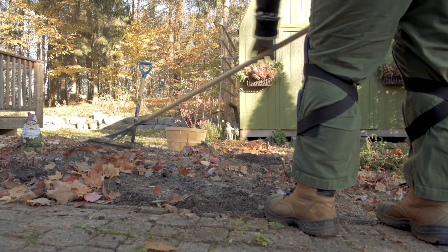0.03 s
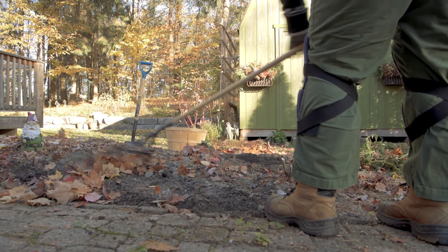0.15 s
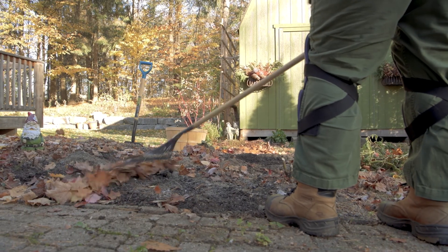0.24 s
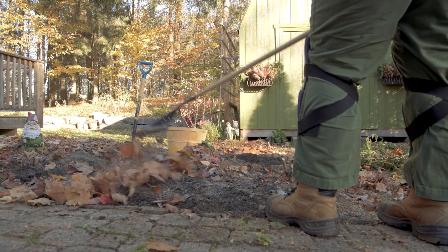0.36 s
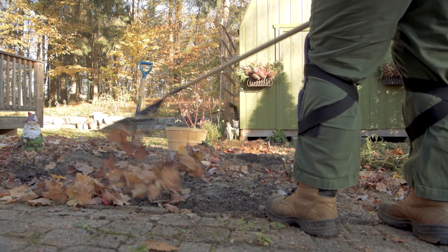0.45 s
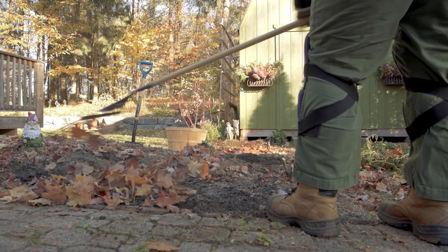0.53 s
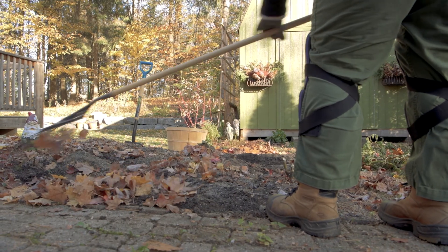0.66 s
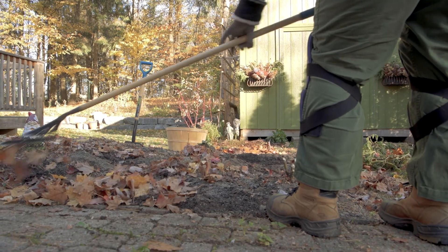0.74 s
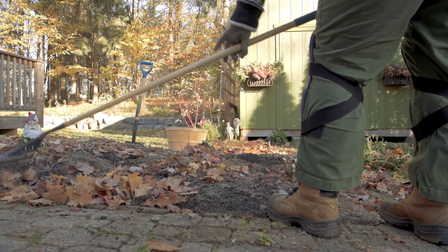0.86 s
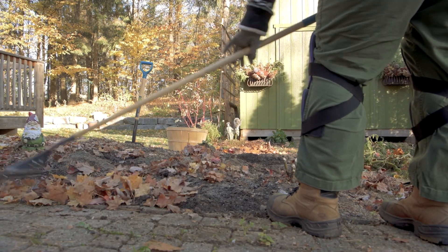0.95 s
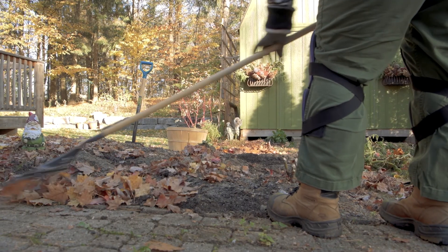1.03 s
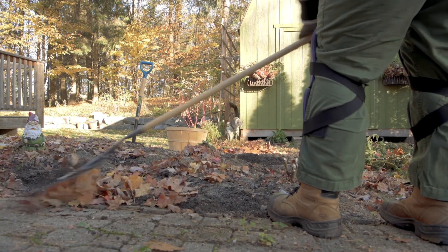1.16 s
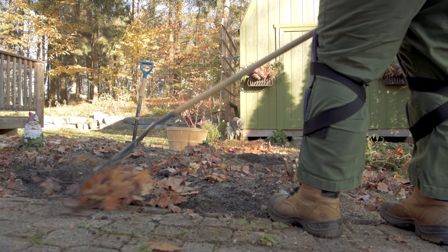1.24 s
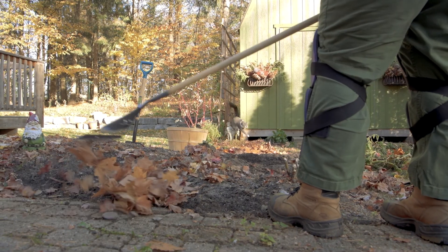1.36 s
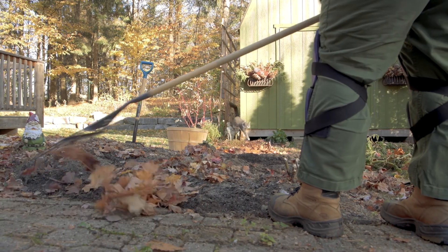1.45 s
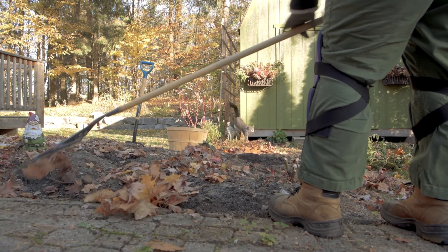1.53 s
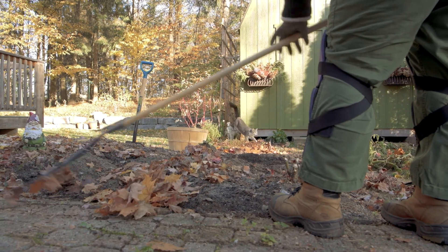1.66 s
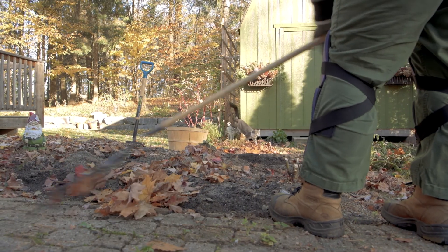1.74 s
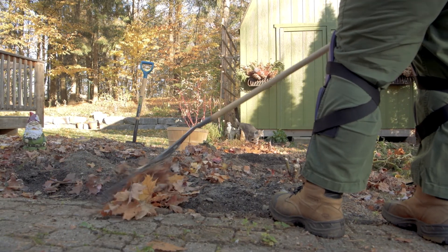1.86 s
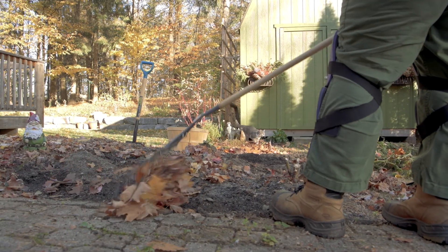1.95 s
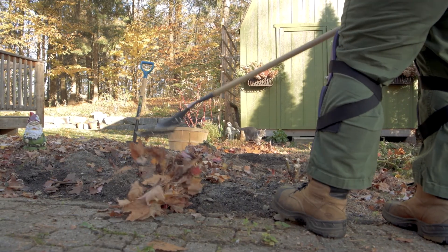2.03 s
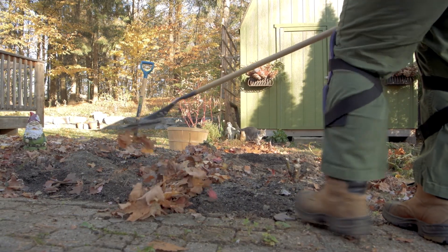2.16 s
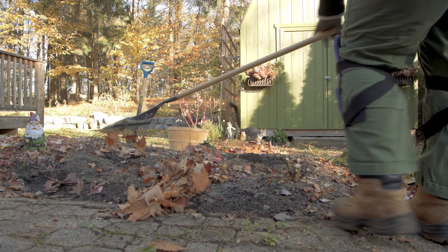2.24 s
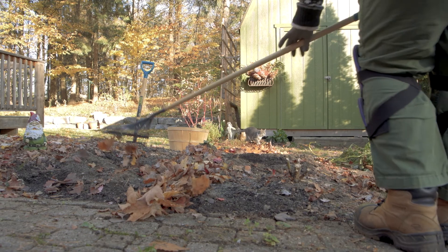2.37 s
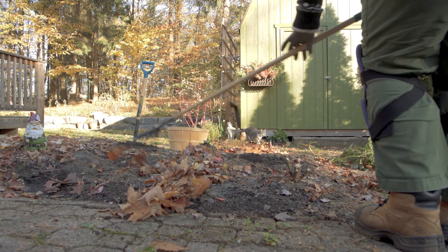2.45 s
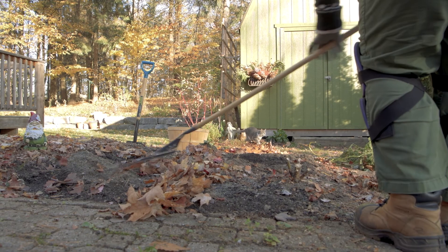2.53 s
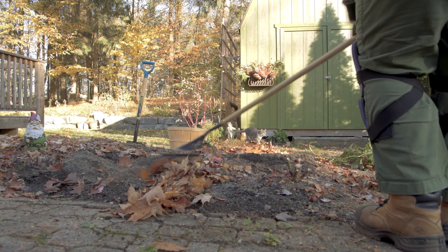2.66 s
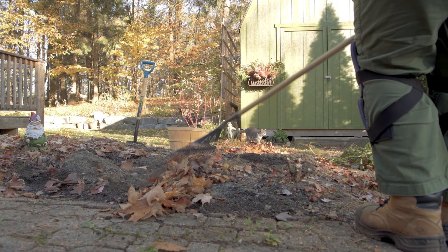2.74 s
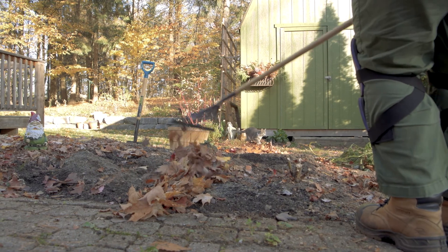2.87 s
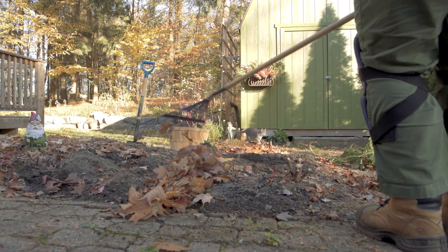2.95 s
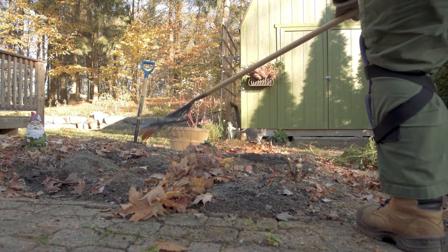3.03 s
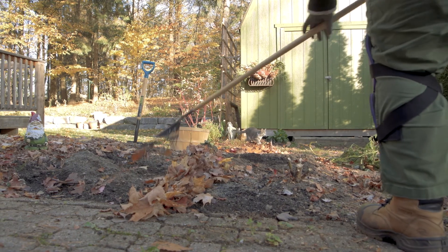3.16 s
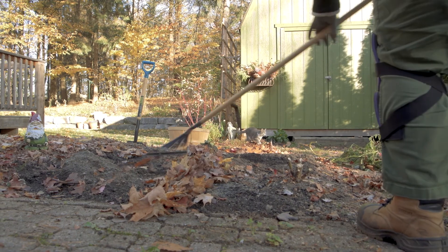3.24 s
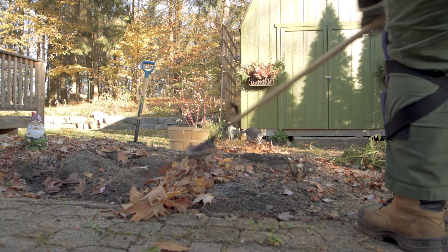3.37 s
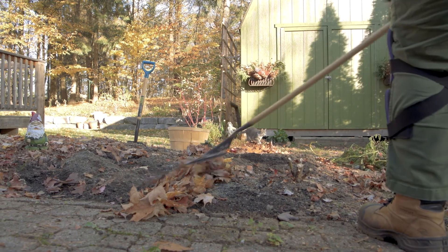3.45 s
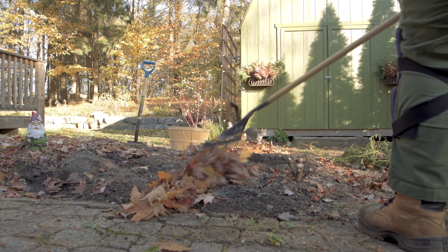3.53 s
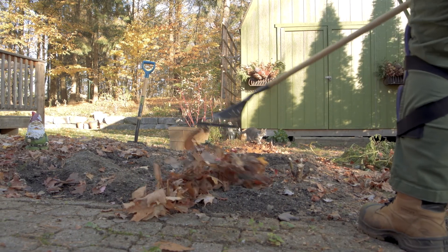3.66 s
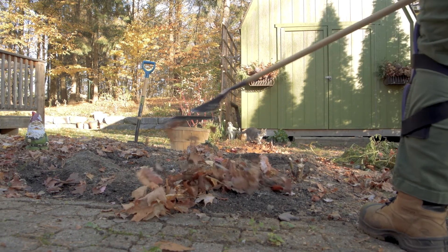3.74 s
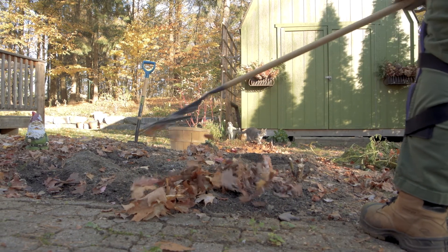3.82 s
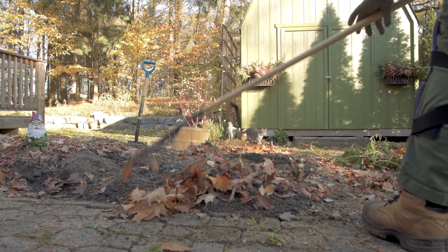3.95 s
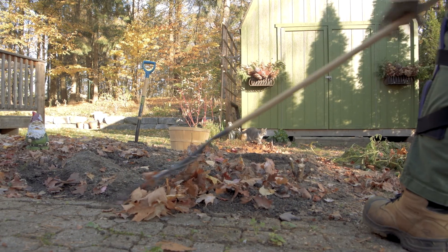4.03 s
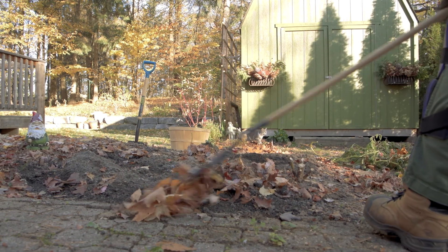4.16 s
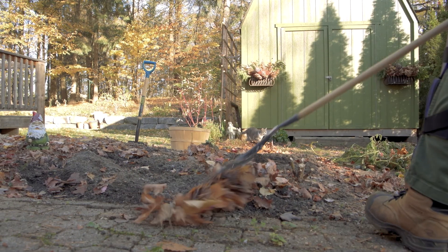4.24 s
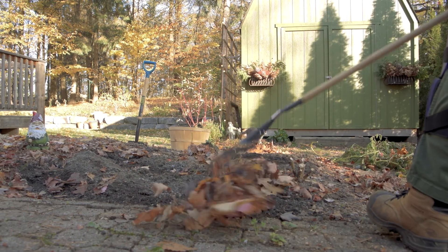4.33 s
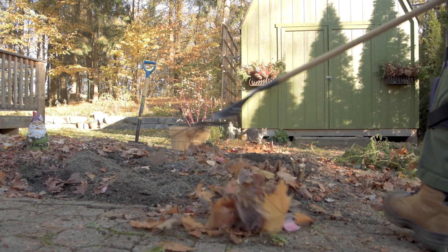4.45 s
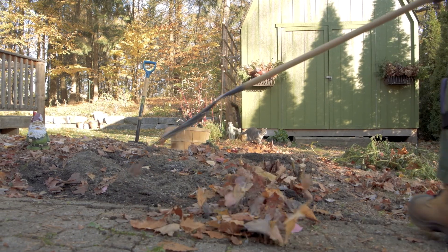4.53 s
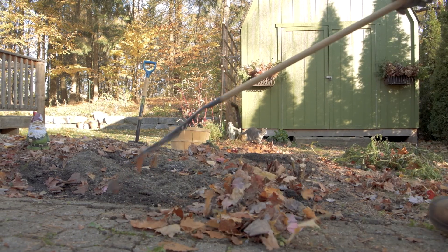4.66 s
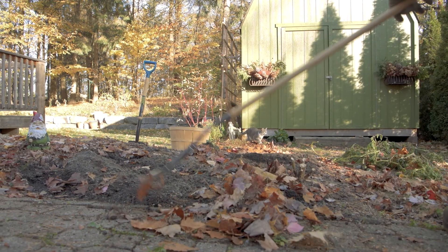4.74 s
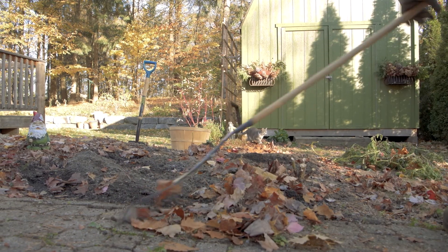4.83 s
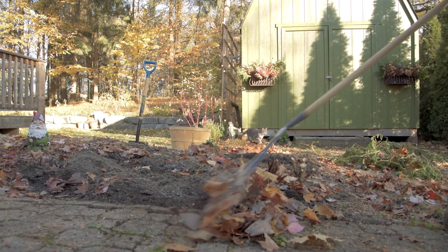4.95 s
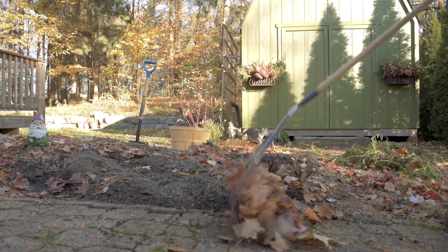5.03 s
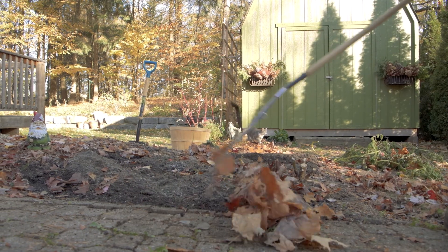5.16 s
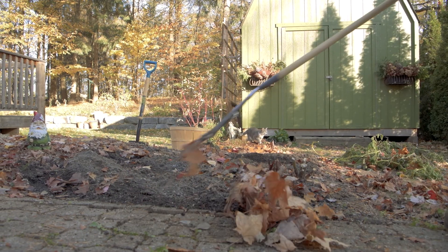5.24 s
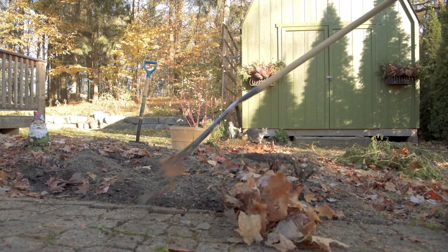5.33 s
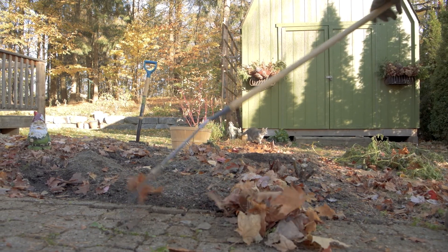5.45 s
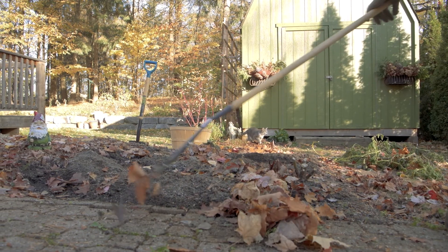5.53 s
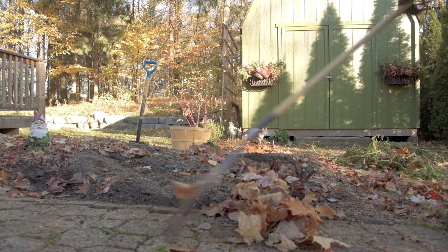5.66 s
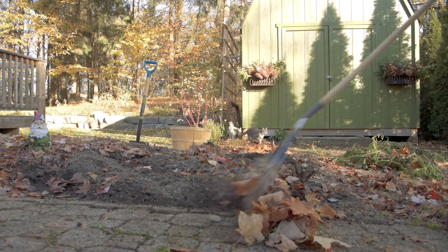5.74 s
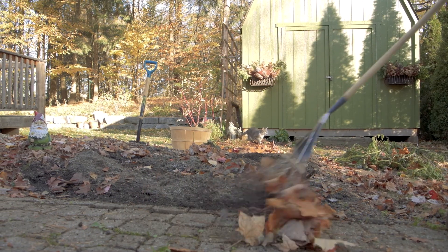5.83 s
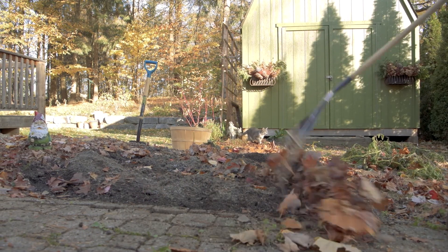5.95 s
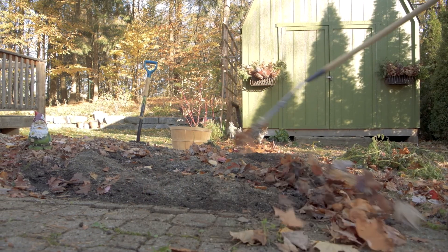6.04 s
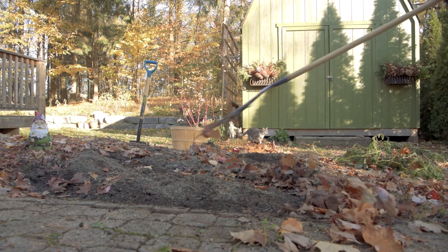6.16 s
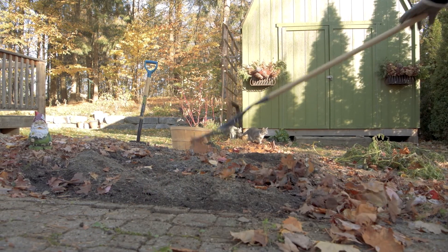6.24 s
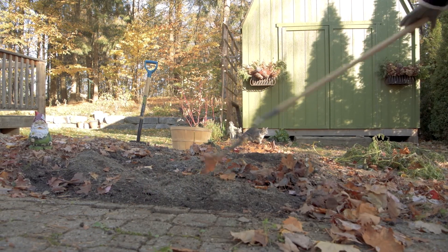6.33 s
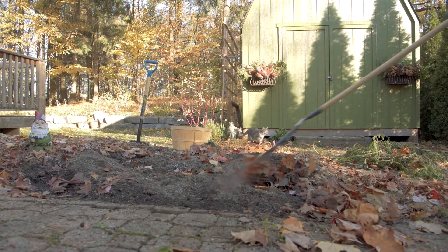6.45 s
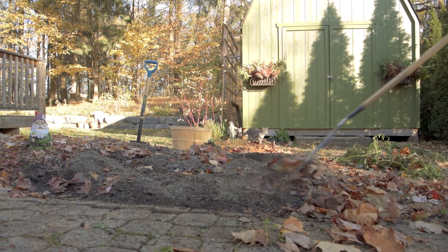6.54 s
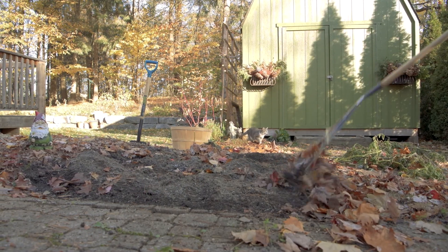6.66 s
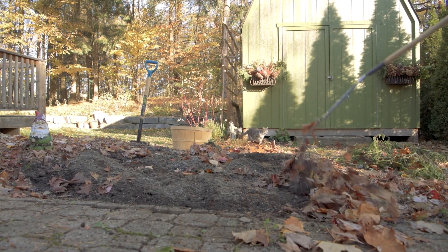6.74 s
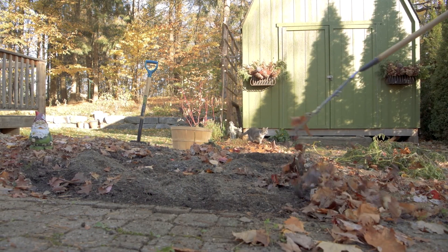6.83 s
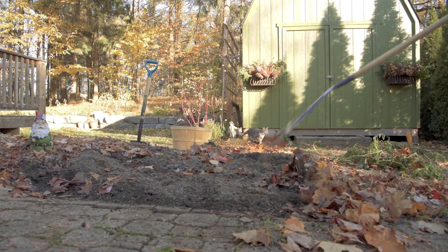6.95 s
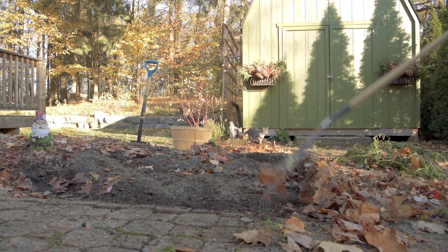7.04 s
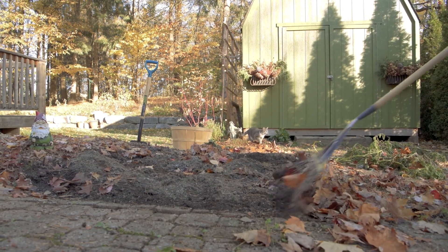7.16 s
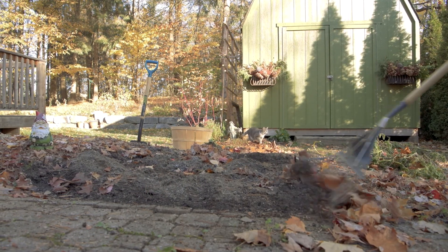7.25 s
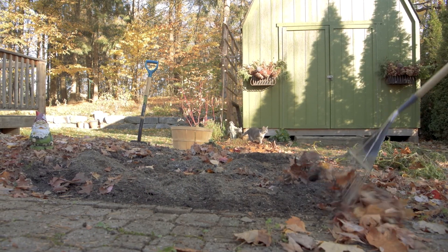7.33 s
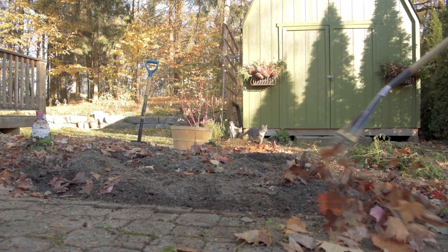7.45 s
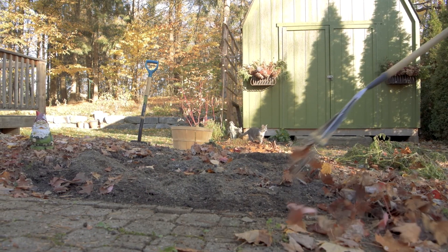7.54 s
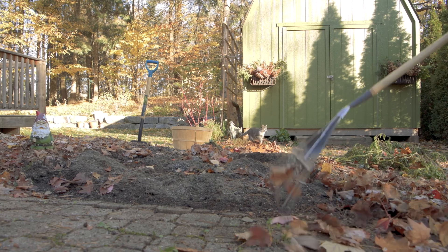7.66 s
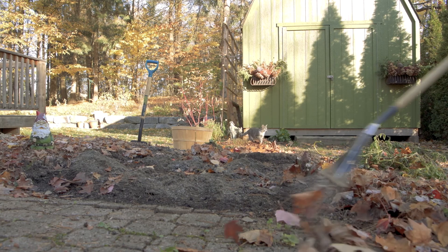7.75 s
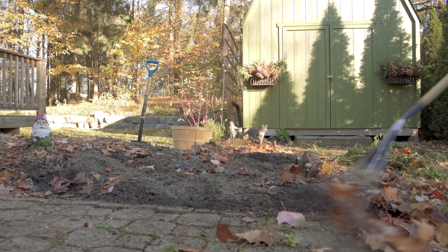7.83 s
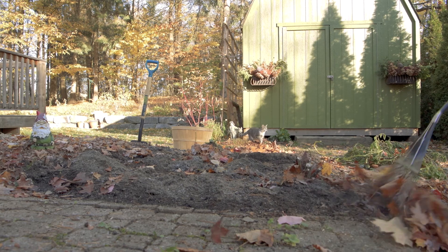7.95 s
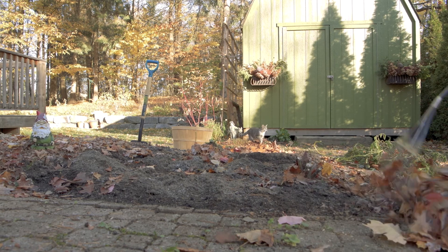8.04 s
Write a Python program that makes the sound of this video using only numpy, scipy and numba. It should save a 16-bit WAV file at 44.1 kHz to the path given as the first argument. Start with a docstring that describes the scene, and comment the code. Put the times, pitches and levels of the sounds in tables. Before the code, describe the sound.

A garden rake works steadily near the microphone. Thin tines tick, scratch and chatter over hard crumbs while dry leaves crackle and the rake head rings faintly. Pulls last about a third of a second, separated by quieter gaps with tumbling leaves, a slight boot shift or rattle. Strokes bunch up later; stalks snap, wind puffs rumble softly and two dull bumps come late. Open yard, short dull reflections.

```python
"""Under a faint outdoor hush, a leaf rake is pulled in quick strokes through dry leaves and frozen soil.
In each stroke the tines land as scattered clicks, then stick and slip; one click train rings tines and head.
The head's resonances shift through the pull, leaves crackle in runs of clicks, and settle after the lift.
Stalks snap, boots shift and the lifted rake rattles as soft noise swells; from about a second in,
puffs of air rumble as low noise on the microphone; late on come two dull, decaying-sine bumps."""
import sys
import numpy as np
from scipy import signal
from scipy.fft import rfft, irfft
from scipy.io import wavfile
from scipy.ndimage import map_coordinates
from numba import njit

SR = 44100
rng = np.random.default_rng(int(sys.argv[2]) if len(sys.argv) > 2 else 0)


def int16_out(signal):
    """Quantize to a 16-bit WAV file."""
    q = np.round(np.clip(np.atleast_2d(signal).T, -1, 1) * 32767)
    wavfile.write(sys.argv[1], SR, q.astype(np.int16))


N = 356813
T = np.arange(N) / SR

# spectrum of the thin tines ringing: f/Hz, relative level/dB
TINE_SPECTRUM = [(1500, -83.5), (4000, -10.5), (6000, -17), (6600, -5), (7200, 2), (7800, 2.5), (8600, 2),
                 (9800, -1.5), (11000, -6.5), (13000, -15.5), (16000, -24.5)]
# spectrum of dry leaves crackling: f/Hz, relative level/dB
CRACKLE_SPECTRUM = [(400, -34.5), (1200, -10.5), (2000, -13.5), (2800, -5), (4100, -1.5), (5000, -3.5),
                    (6000, -7.5), (10000, -10.5), (13000, -11), (16000, -27)]


def undb(db):
    """Decibels to gain."""
    return 10 ** (np.asarray(db) / 20)


def colour(x, points, size=4096):
    """Minimum-phase filter with a spectrum of (f/Hz, level/dB) points, scaled to unit energy."""
    hz, db = np.transpose(points)
    bin_hz = np.arange(size // 2 + 1) * SR / size
    gain_db = np.interp(np.log(bin_hz + 1), np.log(hz), db)
    cepstrum = irfft(np.log(undb(gain_db)))
    # folding the cepstrum forward makes the filter causal
    cepstrum[1:size // 2] *= 2
    cepstrum[size // 2 + 1:] = 0
    response = irfft(np.exp(rfft(cepstrum)))
    return signal.oaconvolve(x, response / np.linalg.norm(response))[:N]


def walk(rate):
    """Random levels, rate a second, joined by straight lines; spread near 1."""
    knots = rng.standard_normal(N // 20)
    line = np.interp(T * rate, np.arange(len(knots)), knots)
    return line * np.sqrt(3 / 2)  # restores the spread lost between knots


def clicks(rate, spread_db):
    """Random clicks, rate a second, most small and a few large; rms 1."""
    chance, size, sign = rng.random(N), rng.exponential(size=N), rng.choice([-1, 1], N)
    strength = undb(spread_db * np.minimum(size, 4.5))
    x = (chance < rate / SR) * sign * strength / np.sqrt(rate)
    return x / np.std(x)


def bursts(times, gains, decay_s):
    """Envelope of blows that start at once and die away exponentially."""
    blows = np.bincount((times * SR).astype(int), gains, N)
    return signal.lfilter([1], [1, -np.exp(-1 / (decay_s * SR))], blows + 1e-18)


def hops(rate, decay_s, steady):
    """Jerky friction: the force jumps at each hop and relaxes after it; rms 1."""
    kicks = (rng.random(N) < rate / SR) * rng.uniform(.3, 1, N)
    force = signal.lfilter([1], [1, -np.exp(-1 / (decay_s * SR))], kicks) + steady
    return force / np.sqrt(np.mean(force ** 2))


def ramp(start_s, length_s):
    """Straight rise from 0 to 1."""
    return np.clip((T - start_s) / length_s, 0, 1)


def hump(middle_s, half_s):
    """A smooth bell-shaped swell that peaks at 1."""
    return np.exp(-np.minimum(((T - middle_s) / half_s) ** 2, 50))


def swells(events, width_s):
    """Summed envelope of soft rubs, one for each (t/s, level/dB)."""
    return sum(undb(db) * hump(s + width_s, width_s) for s, db in events)


@njit
def resonate(x, hz, width):
    """State-variable band-pass whose centre moves; gain 1 at the centre."""
    y, band, low = np.empty(len(x)), 0., 0.
    for i in range(len(x)):
        g, k = np.tan(np.pi * hz[i] / SR), width / hz[i]
        v = (band + g * (x[i] - low)) / (1 + g * (g + k))
        band, low, y[i] = 2 * v - band, low + 2 * g * v, k * v
    return y


def garden():
    """Faint outdoor hush: coloured noise with a slowly wandering level."""
    # spectrum of the hush: f/Hz, relative level/dB
    hush_spectrum = [(20, 2), (60, -7), (130, -7.5), (280, -2.5), (450, -6.5), (1000, -9.5), (2000, -10.5),
                     (4000, -6), (9000, -16.5), (16000, -21)]
    level_db = -48.5 + 1.2 * walk(3)
    return colour(rng.standard_normal(N), hush_spectrum) * undb(level_db)


def stroke(name):
    """One column of the stroke table, held from each landing to the next."""
    # one row a stroke: lands t/s, bites t/s, lifts t/s, first touch relative to the pull/dB,
    # tine scratch/dB, sag by the end of the pull/dB, leaf rustle/dB, load on the head/dB, settling leaves/dB,
    # bending resonance at the bite f/Hz and at the lift f/Hz (before flexing),
    # relative levels of twisting mode/dB, soil/dB, tip rasp/dB
    stroke_rows = [ (0.006, 0.04, 0.31, -17.5, -11, 2, -22, -29.5, -29.5, 1220, 1190, 13.5, 2.5, -4),
                   (0.833, 0.907, 1.28, -9.5, -10, 7.5, -26, -35, -31.5, 1100, 1140, 10.5, -7, -12),
                   (1.628, 1.68, 1.934, -19, -10.5, 6, -26, -31.5, -33.5, 1060, 1200, 10, -9, 2.5),
                   (2.459, 2.501, 2.747, -17, -16.5, -5.5, -24, -30.5, -33.5, 1080, 1104, 4, -6, -1),
                   (3.213, 3.295, 3.503, -7, -15, 3.5, -25, -25.5, -30, 1075, 1150, 4, -2.5, -6),
                   (4.004, 4.036, 4.277, -5.5, -11, 6, -25.5, -25.5, -38.5, 1065, 1220, 10, -3, -1.5),
                   (4.772, 4.806, 5.020, -8.5, -11.5, 2, -25, -26, -41, 1130, 1070, 2, -2.5, 1.5),
                   (5.418, 5.445, 5.46, -3.5, -20.5, -0.5, -26, -37.5, -28, 1100, 1118, -8, 2, 2),
                   (5.597, 5.608, 5.886, -9.5, -11.5, 11, -25, -26.5, -33, 1155, 1085, -8, -1, 5.5),
                   (6.348, 6.398, 6.655, -9.5, -18.5, 29.5, -25, -29.5, -34, 1120, 1200, -14, 8.5, -7),
                   (7.078, 7.109, 7.240, -5, -15.5, 4, -28.5, -27.5, -38, 1170, 1060, 5, 0, 11),
                   (7.256, 7.277, 7.338, -7, -16.5, 0.5, -26.5, -26.5, -35.5, 1140, 1070, 8, 0, -2),
                   (7.734, 7.756, 7.98, -9, -18, 7, -25, -23.5, -39.5, 1170, 1046, 4, -4, 5.5)]
    columns = "land bite lift touch scratch sag rustle load settle bend_from bend_to twist soil rasp".split()
    table = np.array(stroke_rows)
    row = np.maximum(np.searchsorted(table[:, 0], T) - 1, 0)
    return table[row, columns.index(name)]


def progress():
    """How far the pull has come: 0 at the bite, 1 at the lift."""
    return ramp(stroke("bite"), stroke("lift") - stroke("bite"))


def effort():
    """Touch, bite, sagging pull and lift set the tine scratch, the leaf rustle and the load on the head."""
    # the tines ride up on leaves and lose their grip: middle t/s, half length/s, depth/dB
    skips = [(0.249, .064, 15), (0.878, 0.04, 16), (1.924, 0.015, 7), (3.266, 0.023, 13), (3.498, .014, 6),
             (4.194, 0.032, 11), (7.12, 0.0092, 9)]
    # tossed leaves tumble back onto the heap: middle t/s, half length/s, rustle level/dB
    tumbles = [(.65, 0.021, -47), (3.772, 0.079, -41.5), (4.41, 0.11, -40.5), (6.883, .015, -45.5)]
    land_s, bite_s = 0.011, 0.05  # rise of the first touch and of the pull
    sag_power = 2.2  # the pull weakens late rather than early
    tine_release, leaf_release, head_release = 348, 179, 156  # dB per second after the lift
    settle_db_per_s = 38  # stirred leaves come to rest
    leaf_share, head_share = 0.14, 0.56  # how far leaves and head follow a weakening pull
    cling_tine_db, cling_head_db = -4.5, -14  # settling leaves still brush the lifted tines and head

    touch = undb(stroke("touch")) * ramp(stroke("land"), land_s)
    press = touch + (1 - touch) * ramp(stroke("bite"), bite_s)
    slack_db = stroke("sag") * progress() ** sag_power
    slack_db = slack_db + sum(db * hump(s, half_s) for s, half_s, db in skips)
    lifted_s = np.maximum(T - stroke("lift"), 0)
    settling = undb(stroke("settle") - settle_db_per_s * lifted_s) * progress()
    settling = settling + sum(undb(db) * hump(s, half_s) for s, half_s, db in tumbles)
    scratch = press * undb(stroke("scratch") - slack_db - tine_release * lifted_s)
    rustle = press * undb(stroke("rustle") - leaf_share * slack_db - leaf_release * lifted_s)
    load = press * undb(stroke("load") - head_share * slack_db - head_release * lifted_s)
    return (np.hypot(scratch, settling * undb(cling_tine_db)), np.hypot(rustle, settling),
            np.hypot(load, settling * undb(cling_head_db)))


def tines(scratch, slips):
    """Slips ring the thin tines, which chatter as they hop over frozen crumbs; hard grains tick on them."""
    # spectrum of hard grains ticking on the tines: f/Hz, relative level/dB
    grit_spectrum = [(2000, -31), (6000, 3), (9000, -31), (13000, 26), (16000, 2)]
    chatter = hops(190, .004, 1.2)
    ring = colour(slips * scratch * chatter, TINE_SPECTRUM) * undb(-1.08)
    ticks = colour(clicks(600, 3.2), grit_spectrum) * undb(-21)
    return ring + ticks * scratch


def sway():
    """A mode swells and fades as other tines take the load."""
    return undb(3.2 * walk(18))


def head(push, twist_hz=1492):
    """The fan rings: a bending mode that shifts with the pull, a twisting mode and a few that only waver."""
    # other resonances of the rake head: centre f/Hz, width/Hz, relative level/dB
    wavering_modes = [(995, 45, 1.5), (1873, 76, 2.5), (2247, 144, 4), (2500, 150, 1), (3690, 740, -4.5)]
    bend_hz = stroke("bend_from") + (stroke("bend_to") - stroke("bend_from")) * progress()
    flex = 1 + .018 * walk(12)
    out = resonate(push, bend_hz * flex ** 2, 78.0) * undb(8.5)
    out += resonate(push, twist_hz * np.sqrt(flex), 36.0) * undb(stroke("twist") - 1.0)
    for hz, width_hz, db in wavering_modes:
        out += resonate(push, hz * flex, 1. * width_hz) * undb(db) * sway()
    return out


def squeak(length_s, hz, width_hz, glide):
    """A brief swell of stick-slip: noise in one narrow, sliding resonance; rms near 0.7."""
    count = int(length_s * SR)
    slide_hz = hz * (1 + glide * np.linspace(-1, 1, count))
    ring = resonate(rng.standard_normal(count), slide_hz, 1. * width_hz)
    return ring / np.std(ring) * np.sin(np.linspace(0, np.pi, count))


def catches(pull, count=1100):
    """Single tines keep catching, each at a pitch of its own; a few drag long and loud."""
    # a tine drags over a stone or stiff leaf: start t/s, length/s, centre f/Hz, relative level/dB
    long_catches = [(0.084, .067, 2220, -26.5), (1.182, 0.19, 1470, -34), (1.86, 0.096, 1470, -31.5),
                    (3.281, 0.07, 1096, -26), (4.17, 0.055, 1225, -29.5), (4.82, 0.071, 3310, -26.5),
                    (4.87, 0.035, 2070, -25), (5.608, .064, 2600, -19), (5.748, 0.11, 1080, -29),
                    (6.403, 0.04, 2090, -27), (6.453, 0.069, 2730, -24), (7.144, .14, 3870, -25.5),
                    (7.16, 0.097, 1500, -35), (7.301, .049, 2230, -29), (7.81, .057, 1480, -27)]
    small, large = np.zeros(N + SR), np.zeros(N + SR)
    for when, length, pitch, glide in rng.random((count, 4)):
        grain = squeak(.015 + .04 * length, 1600 + 5000 * pitch, 100, .04 * (glide - .5))
        start = int(when * N)
        small[start:start + len(grain)] += grain * undb(rng.uniform(-5, 4))
    for s, length_s, hz, db in long_catches:
        grain = squeak(length_s, hz, 60 + 0.015 * hz, -.012)
        start = int(s * SR)
        large[start:start + len(grain)] += grain * undb(db)
    return (small[:N] * pull * undb(-5) + large[:N]) * hops(220, .003, 1)


def drag(scratch, rustle, load, slips):
    """On the ground the tips rasp, the head rings and the soil grinds; all ease off as the rake lifts."""
    # spectrum of tines scraping soil: f/Hz, relative level/dB
    soil_spectrum = [(80, -23), (200, 1.5), (450, 3.5), (800, -4.5), (1300, 1), (2500, 10.5), (4000, -5.5),
                     (8000, -34)]
    # the tine tips stiffen as the pull bends them, over a 46 ms time constant
    bent = 1 - np.exp(-np.maximum(T - stroke("bite"), 0) / 0.046)
    rasp_hz = 3500 + 570 * bent + 110 * walk(12)
    contact = scratch / (scratch + undb(-30.0))
    ring = head(slips * load * np.sqrt(contact)) * undb(8.5)
    rasp = resonate(clicks(2500, 1.3) * rustle * contact, rasp_hz, 530.0) * undb(stroke("rasp") + 10.0)
    grit = colour(clicks(3000, 0.75) * load * undb(stroke("soil") - 6.5), soil_spectrum)
    return ring + rasp + grit + catches(rustle * contact ** 2)


def leaves(rustle):
    """Dry leaves buckle in runs of tiny cracks, denser the harder they are stirred; brittle ones snap."""
    # single stalks snap: t/s, relative level/dB
    stalk_snaps = [(0.5016, -19), (1.603, -24), (2.9616, -25), (7.3734, -12), (7.444, -21), (7.682, -16.5)]
    # spectrum of brittle leaves and stalks snapping: f/Hz, relative level/dB
    snap_spectrum = [(400, -15), (1000, -8), (4000, 1), (9000, -8), (13000, -6), (16000, -13)]
    rate = 2200 + 6000 * np.minimum(rustle / undb(-27.5), 1)  # cracks per second
    cracks = clicks(rate, 1.7) * hops(220, .003, 1.1)
    brittle = clicks(160, 3.0) * undb(-11.5)
    s, level_db = np.transpose(stalk_snaps)
    stalks = rng.standard_normal(N) * bursts(s, undb(level_db - 6), 0.0017)
    return colour(cracks * rustle, CRACKLE_SPECTRUM) + colour(brittle * rustle + stalks, snap_spectrum)


def strikes():
    """The tines hit in a quick scatter of clicks that also crushes leaves and rings the head."""
    # tines land or snap free: t/s, relative level/dB, head relative to tines/dB
    blows = [(0.042, -9.5, -13), (0.32, -5.5, -36), (0.844, -14, -15), (0.8637, -8, -21), (0.92, -4, -11.5),
             (1.3033, -3, -22), (1.6355, -15, -24), (1.664, -7, -21), (1.695, -0.5, -34), (2.461, -24, -6),
             (2.5042, -16, -2), (2.622, 1, -11.5), (2.7584, -1, -33), (3.2004, -29, -5),
             (3.2226, -10.5, -6), (3.274, -6.5, -14), (3.3263, -3, -28), (3.455, -2, -35),
             (3.522, -4.5, -9), (4.017, -3, -15), (4.07, -3, -24), (4.774, -15, -5.5), (4.8307, -2.5, -11),
             (5.4246, -8, -18), (5.464, -10, -13), (5.608, -10.5, -2), (6.3332, -28, 7), (6.3599, -32, -17),
             (6.423, 2, -29), (7.0896, -3.5, -60), (7.3337, -11, -4), (7.7367, -26, 7)]
    s, level_db, head_db = np.transpose(blows)
    scatter, decay_s = clicks(9000, 2.2), .007
    bright = colour(scatter * bursts(s, undb(level_db - 10.5), decay_s), TINE_SPECTRUM)
    crushed = colour(scatter * bursts(s, undb(level_db + head_db / 2 - 11), decay_s), CRACKLE_SPECTRUM)
    return bright + crushed + head(scatter * bursts(s, undb(level_db + head_db - 2.5), decay_s))


def ground_bounce(x, lag_s=.00133):
    """The hard ground returns the rake's sound a moment later; the lag wanders as the rake moves."""
    lag = lag_s * (1 + .04 * walk(7))
    return x + .25 * map_coordinates(x, [np.arange(N) - lag * SR], order=3)


def yard(x, t60_s=0.37, wet_db=-15):
    """Paving, shed and trees scatter back a short, dull tail of decaying noise."""
    age = T[:SR // 2]
    tail = rng.standard_normal(len(age)) * undb(-60 * age / t60_s) * (age > .004)
    tail = signal.sosfilt(signal.butter(1, 6000, fs=SR, output="sos"), tail / np.linalg.norm(tail))
    return x + undb(wet_db) * signal.oaconvolve(x, tail)[:N]


def handling():
    """Between strokes boots shift as low noise and the lifted rake rattles as soft swells of clicks."""
    # boots shift on the paving: t/s, relative level/dB
    boot_shifts = [(0.819, -45.5), (2.399, -50)]
    # the lifted rake rattles: t/s, relative level/dB
    rake_rattles = [(2.361, -31), (7.546, -31), (7.6, -31.5)]
    boots = colour(rng.standard_normal(N),
                   [(80, -15), (180, 1), (260, -1), (400, -14), (1000, -15), (4000, -45)])
    rattle = colour(clicks(5300, 0.85),
                    [(300, -13), (800, -7.5), (1150, 0.5), (1500, -11), (2000, 1.0), (2800, -22), (6000, -48)])
    return rattle * swells(rake_rattles, 0.0079) * undb(-7) + boots * swells(boot_shifts, 0.023) * undb(-0.5)


def air():
    """Eddies buffet the microphone in short, fluttering puffs of low noise."""
    # puffs of air: middle t/s, half length/s, relative level/dB
    air_puffs = [(1.165, 0.048, -38), (1.293, 0.069, -31), (1.434, 0.11, -37.5), (1.693, 0.087, -52),
                 (3.435, 0.052, -29.5), (3.572, 0.028, -30), (3.662, 0.037, -40), (4.965, 0.079, -34),
                 (6.345, 0.043, -37), (6.49, 0.079, -40), (6.647, 0.041, -32), (6.805, .06, -48)]
    wake_db, wake_s = -21, 0.091  # weak eddies linger after each puff
    gust = 0
    for s, half_s, db in air_puffs:
        wake = undb(wake_db) * ramp(s, half_s) * np.exp(-np.abs(T - s) / wake_s)
        gust = gust + undb(db) * (hump(s, half_s) + wake)
    flutter = undb(3 * walk(25) - 1.5)
    eddies = colour(rng.standard_normal(N) * flutter,
                    [(10, -3.5), (28, 2.5), (70, -4.5), (130, -15), (220, -21.5), (450, -36.5), (2000, -63)])
    return eddies * gust * undb(4.0)


def bumps(hz=230, decay_s=0.0015):
    """Soft knocks: sines that die within two cycles."""
    # dull bumps: t/s, relative level/dB
    knocks = [(6.317, -21.5), (7.994, -23)]
    out = 0
    for s, db in knocks:
        age = np.maximum(T - s, 0)
        envelope = age / decay_s * np.exp(-age / decay_s)
        out = out + undb(db + 14.5) * envelope * np.sin(2 * np.pi * hz * age)
    return out


def scene():
    """The same slips drive the tines and the head; leaves, handling, bumps, air and garden join them."""
    scratch, rustle, load = effort()
    slips = clicks(8000, 2.05)
    rake = ground_bounce(tines(scratch, slips) + drag(scratch, rustle, load, slips) + strikes())
    near = yard(rake + leaves(rustle) + handling())
    return (near + bumps() + air() + garden())[None]


def record(dry):
    """Soft saturation rounds the highest peaks and a steep low-pass cuts the top."""
    rounded = dry / (1 + (dry / .93) ** 6) ** (1 / 6)
    top_hz = 16300
    return signal.sosfilt(signal.ellip(10, .1, 80, top_hz, fs=SR, output="sos"), rounded)


dry = scene()
out = record(dry)
int16_out(out)
```